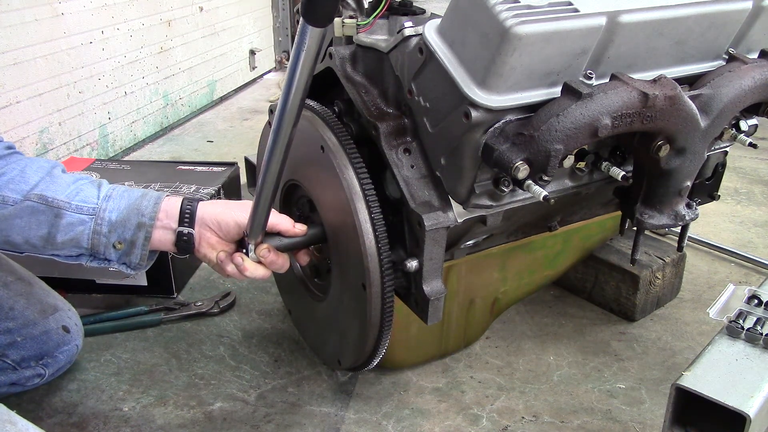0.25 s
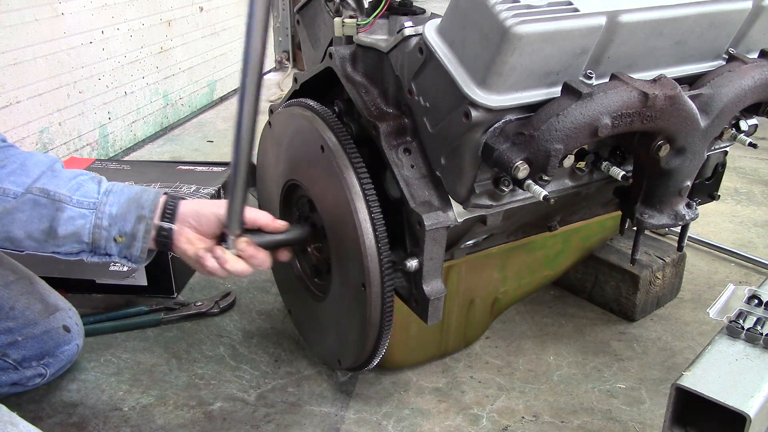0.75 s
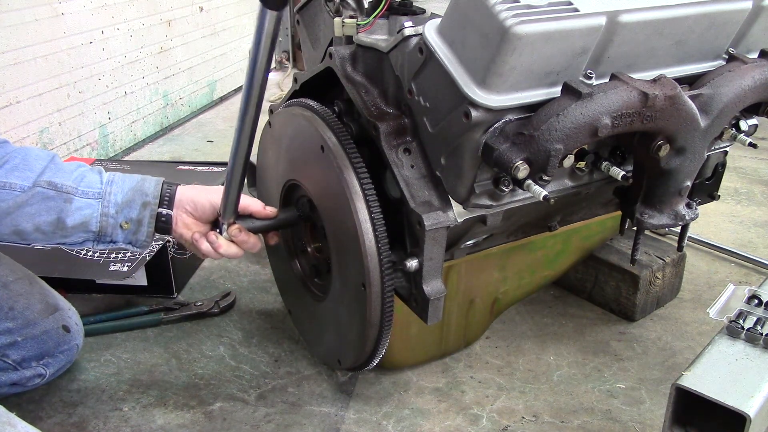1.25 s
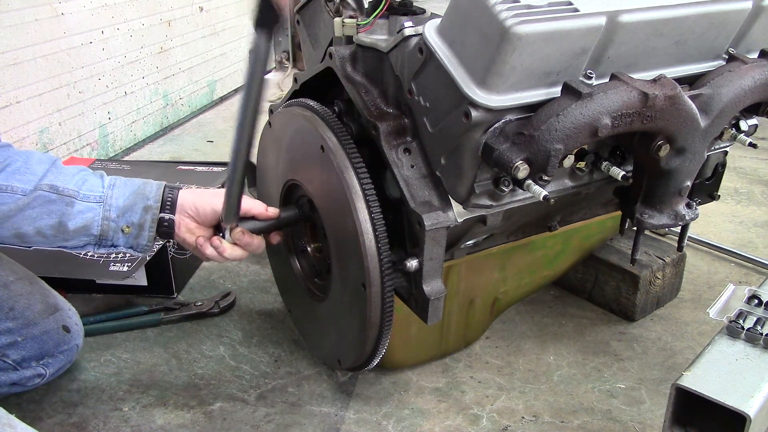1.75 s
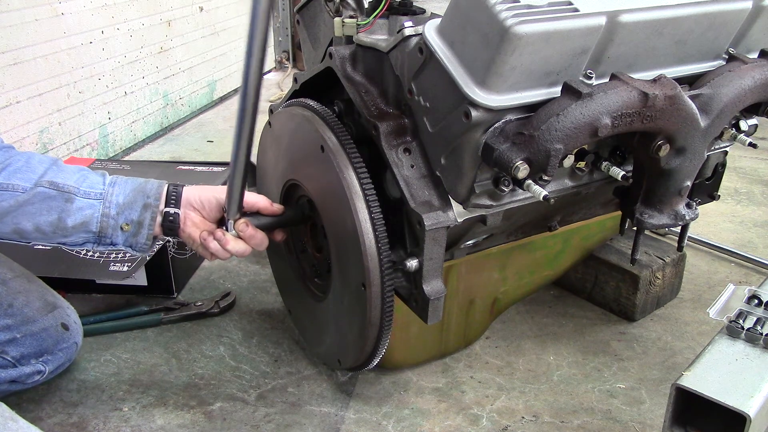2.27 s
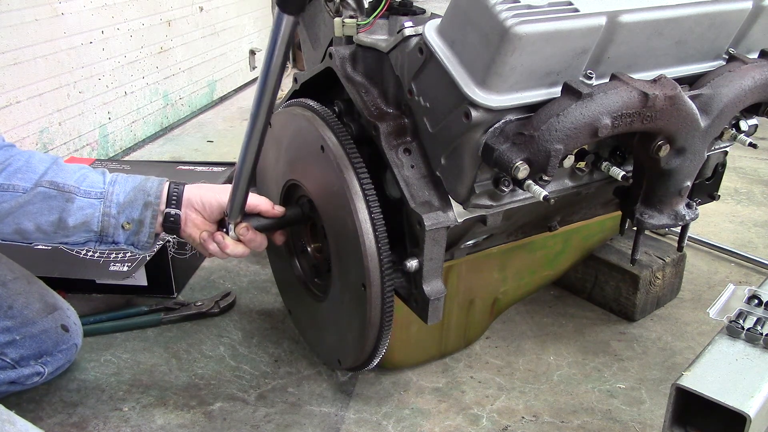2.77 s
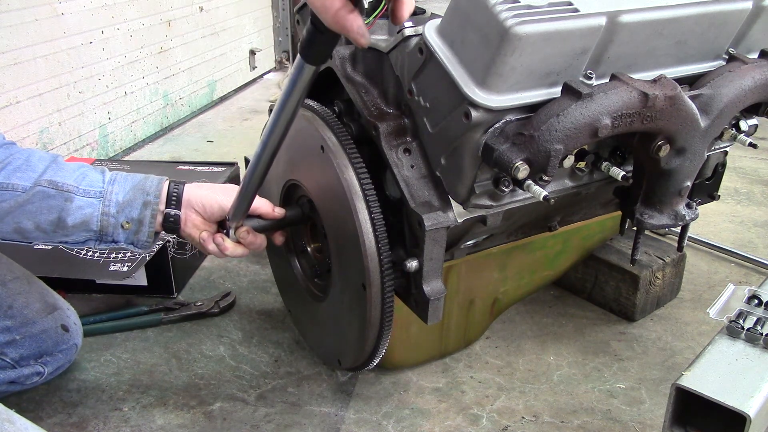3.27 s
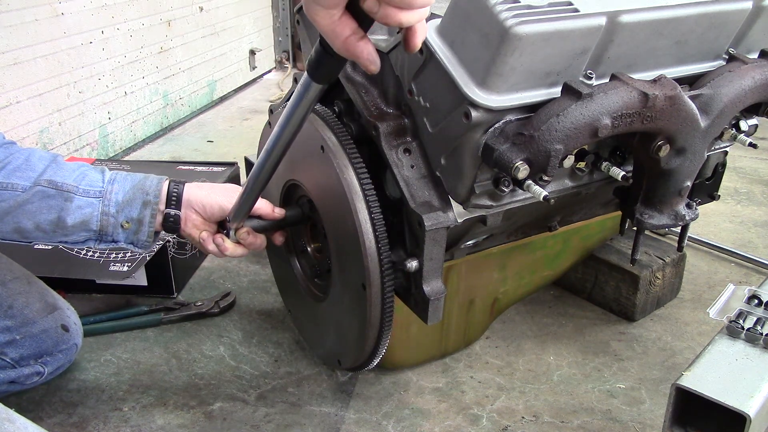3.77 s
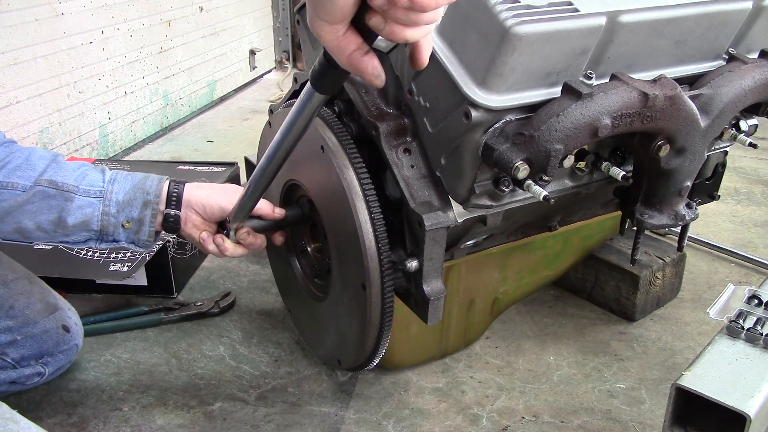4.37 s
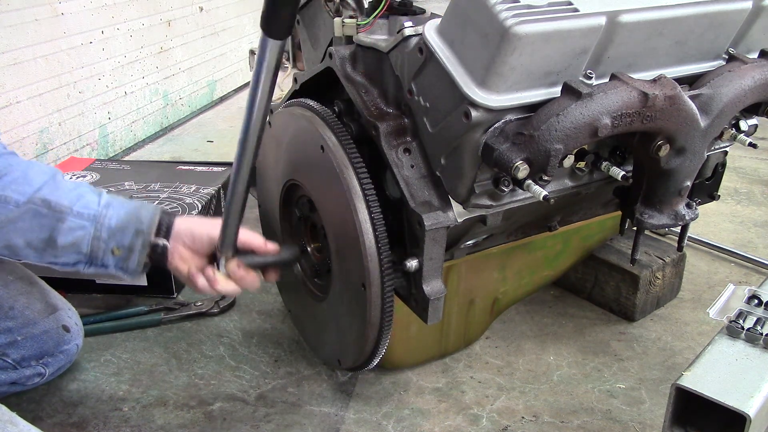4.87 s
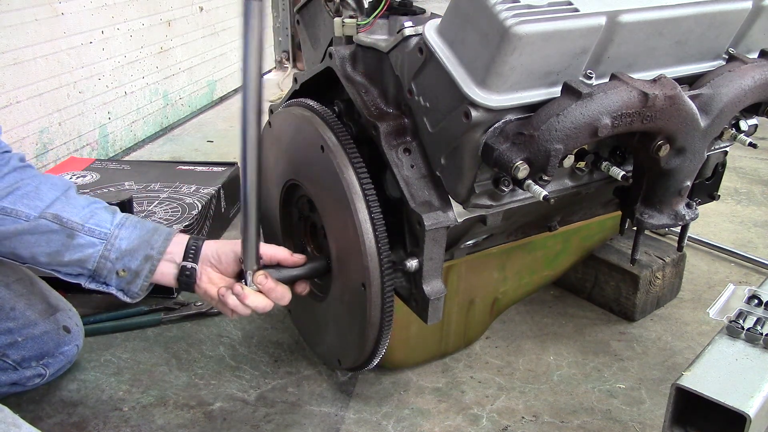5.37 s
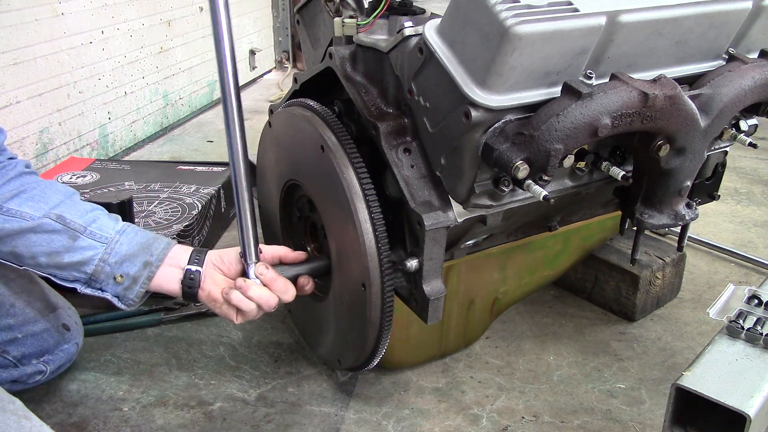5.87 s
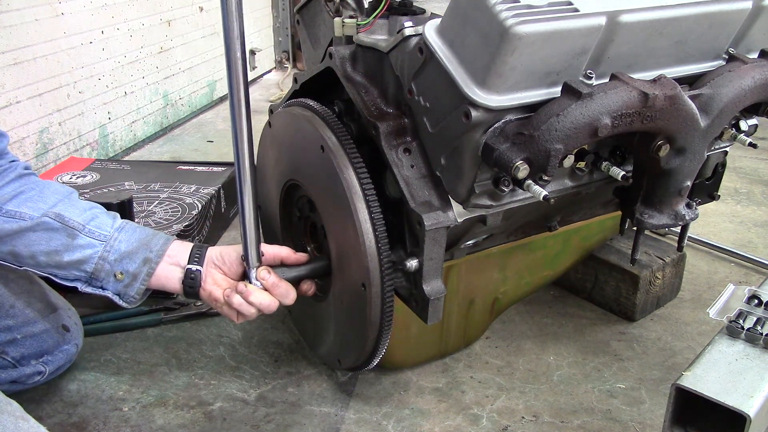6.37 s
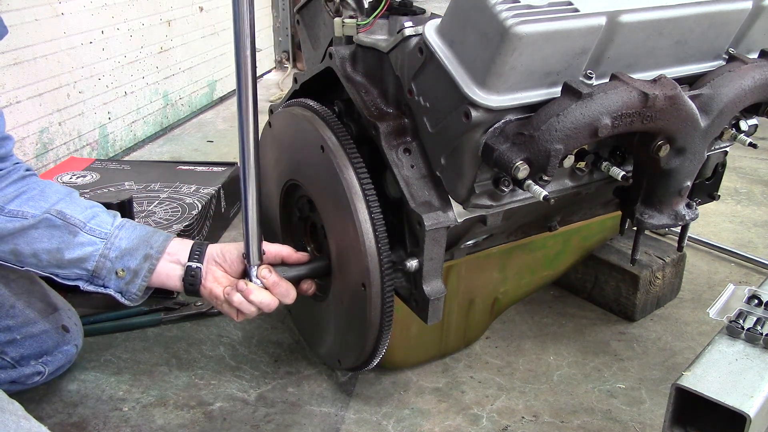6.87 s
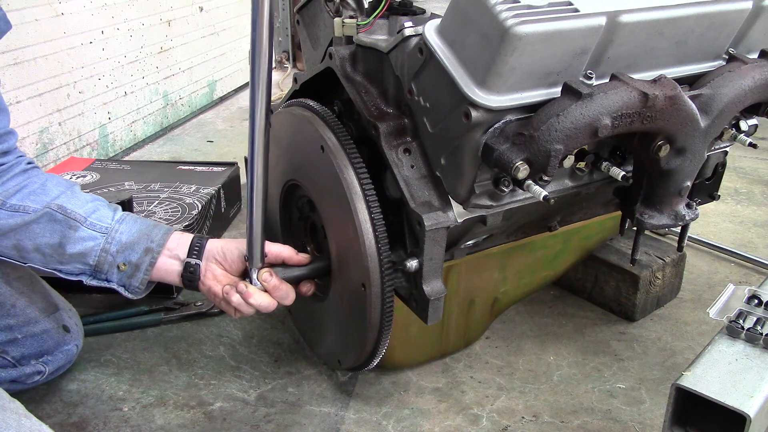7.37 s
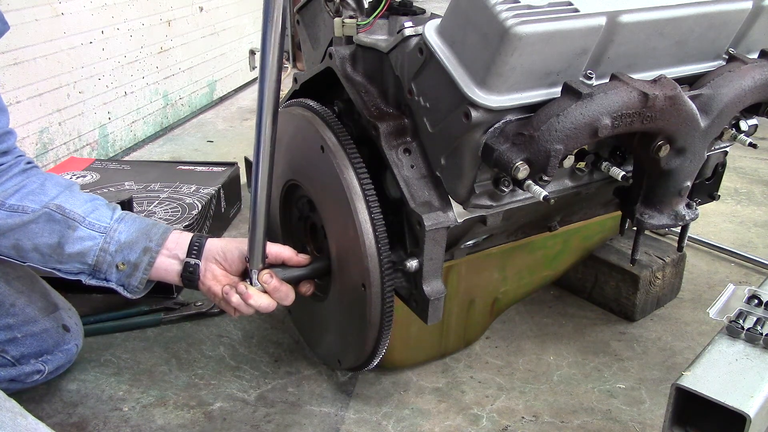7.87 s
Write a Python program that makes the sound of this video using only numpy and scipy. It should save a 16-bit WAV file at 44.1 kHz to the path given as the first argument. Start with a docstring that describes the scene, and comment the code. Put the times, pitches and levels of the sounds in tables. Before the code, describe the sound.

Sharp double clicks from a torque wrench and scattered ringing metal knocks as bolts are tightened in a hard-walled workshop.

```python
"""Sharp clicks and ringing knocks: a click-type torque wrench tightens an engine's flywheel bolts.
The pawl trips and resets three times; socket and extension knock on the bolts and ring the iron.
A hard-walled workshop answers each blow, and a sleeve rustles once as the grip changes.
Lamp hum, a low drone and a nearby camera's own hiss lie underneath."""
import sys
import numpy as np
from scipy import signal
from scipy.fft import rfft, irfft, next_fast_len
from scipy.io import wavfile
from scipy.ndimage import uniform_filter1d, minimum_filter1d

SR = 44100
rng = np.random.default_rng(int(sys.argv[2]) if len(sys.argv) > 2 else 0)


def dump(signal):
    """Clip the signal to [-1, 1] and save it as 16-bit WAV at the path in sys.argv[1]."""
    limited = np.clip(np.atleast_2d(signal).T, -1, 1)
    pcm = np.round(limited * 32767).astype(np.int16)
    wavfile.write(sys.argv[1], SR, pcm)


N = 358533
BLOW_T = np.arange(32768) / SR


def undb(db):
    """dB to amplitude gain."""
    return 10 ** (np.asarray(db) / 20)


def along(curve, hz):
    """Interpolate (Hz, value) points on a log-frequency axis."""
    points_hz, values = np.transpose(curve)
    return np.interp(np.log(np.maximum(hz, 1)), np.log(points_hz), values)


def shaped(x, gain):
    """Filter x by a gain function of Hz."""
    n = next_fast_len(x.shape[-1])
    hz = np.arange(n // 2 + 1) * SR / n
    return irfft(rfft(x, n) * gain(hz), n)[..., :x.shape[-1]]


def eq(x, curve):
    """Filter x by (Hz, dB) points."""
    return shaped(x, lambda hz: undb(along(curve, hz)))


def at_rms(x, db):
    """Scale x to an rms level."""
    return x * undb(db) / np.sqrt(np.mean(x ** 2))


# Each row: frequency in Hz, relative noise density in dB.
AIR_SPECTRUM = [(15, -55), (40, -17), (113, -4), (290, -4.5), (323, -12), (360, -6.5), (390, -1.5),
                (471, -10.5), (568, -5.5), (1060, -9.5), (1580, -13.5), (2240, -17), (5610, -13),
                (10700, -11.5), (15600, -28.5)]
# Each row: centre in Hz, width in Hz, level in dB.
NARROW_DRONES = [(353, 40, -68), (473, 30, -74), (1592, 90, -72.5), (5550, 760, -62), (6180, 530, -65.5),
                 (7570, 260, -70.5), (10600, 1500, -67.5)]
# Each row: frequency in Hz, side minus mid in dB.
AIR_WIDTH = [(25, -7.5), (60, -13.5), (110, -14.5), (200, -7), (380, -8.5), (700, -7), (1290, -9),
             (2380, -9.5), (4400, -15.5), (8120, -13), (15000, -9)]

def air():
    """Workshop drone and camera hiss with narrow hums on top; returns mid and side."""
    def drone_gain(f):
        density = sum(undb(db) ** 2 / width / (1 + (2 * (f - hz) / width) ** 2) ** 2
                      for hz, width, db in NARROW_DRONES)
        return np.sqrt(density * SR / 2)

    broad = eq(rng.standard_normal((2, N)), AIR_SPECTRUM)
    drones = shaped(rng.standard_normal((2, N)), drone_gain)
    mid, side = broad * undb(-56) / np.std(broad[0]) + drones
    return np.array([mid, eq(side, AIR_WIDTH)])


# Each row: frequency in Hz, rms level in dB.
MAINS_HARMONICS = [(120, -83), (360, -70.5), (480, -71)]

def lamps(waver_db=1.2, hold_samples=8192):
    """Lamp hum: mains harmonics whose levels waver slowly."""
    hz, db = np.array(MAINS_HARMONICS).T[:, :, None]
    steps = rng.standard_normal((len(hz), N // hold_samples + 1))
    waver = uniform_filter1d(np.repeat(steps, hold_samples, axis=1)[:, :N], size=hold_samples)
    tones = np.sin(2 * np.pi * (hz * np.arange(N) / SR + rng.random((len(hz), 1))))
    return np.sqrt(2) * (undb(db + waver_db * waver) * tones).sum(0)


# Each row: frequency in Hz, relative noise density in dB.
CLOTH_SPECTRUM = [(60, -44), (150, -9), (350, -4.5), (800, -7), (1500, -11.5), (3000, -24), (6000, -43)]

def sleeve(peak_s=2.574, rise_s=0.1, fall_s=0.11, level_db=-51):
    """Heavy cloth shifts as the grip changes: a dull, grainy rustle swells and fades."""
    t = np.arange(N) / SR - peak_s
    swell = np.exp(-.5 * (t / np.where(t < 0, rise_s, fall_s)) ** 2)
    noise = rng.standard_normal(N)
    grain_db = 0.66 * np.repeat(rng.exponential(size=N // 200 + 1), 200)[:N]
    return swell * at_rms(eq(noise * undb(grain_db), CLOTH_SPECTRUM), level_db)


# Each row: frequency in Hz, T60 in seconds, relative level in dB.
ROOM_BANDS = [(148, 0.87, -1), (390, 0.55, 12.5), (981, 0.81, 1), (2500, 0.68, -0.5), (4640, 0.76, -0.5),
              (8864, 0.21, 0.5), (14000, 0.17, 2)]

def room(mid_db=-10, side_vs_mid_db=-18.5, predelay_s=0.0032):
    """Dense wall reflections, mid and side, new for each blow; the treble dies first."""
    hz, age_s, cells = signal.stft(rng.standard_normal((2, len(BLOW_T))), SR, nperseg=256)
    t60, db = (along(np.array(ROOM_BANDS)[:, [0, k]], hz)[:, None] for k in (1, 2))
    tail = signal.istft(cells * undb(db - 60 * age_s / t60), SR, nperseg=256)[1][:, :len(BLOW_T)]
    tail *= np.clip((BLOW_T - predelay_s) / 0.0015, 0, 1)
    return tail * undb([[mid_db], [mid_db + side_vs_mid_db]]) / np.sqrt(np.sum(tail[0] ** 2))


def crack(resonances, colour, grit_db, rattle_s):
    """Metal contact: damped resonances swell and die within milliseconds; grit fills between them."""
    hz, width, db = np.array(resonances).T[:, :, None]
    t = BLOW_T[:2048]
    age = t * 2 * np.pi * 1.4 * width
    phase = np.arange(len(hz))[:, None] / 2 + .08 * rng.standard_normal(hz.shape)  # neighbours oppose
    tones = undb(db) * width * age * np.exp(-age) * np.sin(2 * np.pi * (hz * t + phase))
    envelope = (1 - np.exp(-t / 0.00018)) * np.exp(-t / rattle_s)
    grit = at_rms(envelope * rng.standard_normal(len(t)), grit_db)
    grit *= rattle_s / .004  # a longer rattle drowns the first strike
    contact = at_rms(tones.sum(0), 0) + eq(grit, np.array(resonances)[:, ::2])
    contact = eq(np.pad(contact, (64, 0)), colour)[64:]
    onset_rms = np.sqrt(np.mean(contact[:int(.005 * SR)] ** 2))
    return np.pad(contact / (1.736 * onset_rms), (0, len(BLOW_T) - len(t)))


def ring(modes, colour, rise_s=0.0045):
    """Free modes of struck metal build up and fade."""
    hz, db, t60 = np.array(modes).T[:, :, None]
    envelopes = undb(db + along(colour, hz) - 60 * BLOW_T / t60)
    tones = np.sin(2 * np.pi * (hz * BLOW_T + rng.random((len(hz), 1))))
    return (1 - np.exp(-BLOW_T / rise_s)) * (envelopes * tones).sum(0)


# Each row: frequency in Hz, relative level in dB, T60 in seconds.
BLOCK_MODES = [(350, -5, .4), (420, -9, .5), (495, -5, .3), (554, -3, .3), (596, -4, .3), (861, -5, .3),
               (980, -6, .3), (1098, -3, .33), (1245, -4, .25), (1390, -6, .25), (1534, -5, .2),
               (1642, -7, .28), (2121, -5, .2), (2213, -8, .28), (2627, -7, .28), (2975, 0, .15)]
FLYWHEEL_MODES = [(746, 0, .75), (1696, 1, .38), (2929, -1, .33), (5095, 3, .25), (5740, 1.5, .14),
                  (6920, -8, .25)]

def blow(row, resonances, part_modes, grit_db, ring_tint, rebound_s):
    """A contact rebounds once and rings tool part, block and flywheel; returns direct, room mid, side."""
    start_s, db, rattle_s, rebound_db, knee_hz, below, above, part_db, block_db, wheel_db = row
    octaves = np.array([-4, 0, 4])
    colour = np.c_[knee_hz * 2. ** octaves, -abs(octaves) * [below, 0, above]]
    ring_colour = colour * [1, ring_tint]
    rings = (undb(part_db) * ring(part_modes, ring_colour)
             + undb(block_db) * ring(BLOCK_MODES, ring_colour)
             + undb(wheel_db) * ring(FLYWHEEL_MODES, ring_colour))
    strike, rebound = (crack(resonances, colour, grit_db, rattle_s) for _ in range(2))
    contact = strike + undb(rebound_db) * np.roll(rebound, int(rebound_s * SR))
    room_send = contact + undb(-9) * rings  # the iron stirs the room less than the crack
    wet = signal.fftconvolve(room_send[None], room(), axes=1)
    out, i = np.zeros((3, N + 2 * SR)), int(start_s * SR)
    out[0, i:i + len(BLOW_T)] = contact + rings
    out[1:, i:i + wet.shape[1]] = wet
    return undb(db) * out[:, :N]


# Each row: start in seconds, level in dB, rattle decay in seconds, rebound in dB, knee in Hz,
# fall below and above the knee in dB/octave, ring of extension, block and flywheel in dB.
SOCKET_KNOCKS = [(.578, -40, 0.0022, -9, 4000, 8, 5, -21, -39, -42),
                 (.681, -42, 0.021, -3, 895, 8, 10.5, -6, -27, -12.5),
                 (.824, -47, 0.0025, -16, 1900, 12, 8, -24, -25, -15),
                 (.988, -24, 0.016, -6, 2420, -0.6, 13, -11.5, -16, -20),
                 (1.43, -40, 0.022, -2, 1400, -1.5, 9, -25, -6, -5.5),
                 (1.457, -12.5, 0.0051, -8.5, 3000, 4, 17, -45, -19.5, -26),
                 (1.82, -38, 0.009, 7, 3000, -1, 1.5, -32.5, -33, -28),
                 (1.833, -3.5, 0.0073, -7.5, 2960, 3, 6.5, -20, -25, -22),
                 (2.239, -44, .003, -26, 900, 5, 7, -29, -32, -29),
                 (4.724, -36, 0.0086, -24, 760, 16, 7.5, -32, -28, -14.5),
                 (5.017, -52, .003, -9, 5200, 6, 10, -26, -29, -27),
                 (5.139, -16.5, 0.014, -4.5, 850, 14, 4.5, -6.5, -22.5, -26),
                 (5.626, -32, 0.0075, -12, 3000, 5, 3.5, -23, -26, -18),
                 (5.653, -14, 0.0064, 0.5, 1770, 5, 10.5, -14, -15, -29),
                 (5.956, -42, .003, -13, 895, 2, 2, -29, -16, -19),
                 (6.424, -39.5, 0.029, -10, 800, 10, 17.5, -24.5, -8.5, -8.5)]
# Each row: frequency in Hz, width in Hz, relative level in dB.
SOCKET_RESONANCES = [(613, 200, 1), (933, 480, -0.5), (1390, 320, 4), (1600, 610, -1), (2161, 310, 2),
                     (2422, 830, 4.5), (2900, 300, 3.5), (3210, 61, 7.5), (4020, 190, -4.5),
                     (4280, 350, -7), (5164, 300, 0.5), (6200, 500, -2.5), (7160, 460, -3),
                     (10500, 1400, -10.5)]
# Each row: frequency in Hz, relative level in dB, T60 in seconds.
EXTENSION_MODES = [(3243, 0, .48), (3269, 0, .24)]

def socket_knocks():
    """The socket knocks on the bolts, ringing the extension bar and the iron."""
    return sum(blow(row, SOCKET_RESONANCES, EXTENSION_MODES, grit_db=-1.5, ring_tint=0.71,
                    rebound_s=.00184) for row in SOCKET_KNOCKS)


# Each row: start in seconds, level in dB, rattle decay in seconds, fall below and above the knee
# in dB/octave, frequency the grip leaves freest in Hz, pin ring in dB.
PAWL_TRIPS = [(.047, -11.5, 0.0066, -1, -3, 2270, -26), (4.1365, -14, 0.0054, -0.5, -2, 2550, -10.5),
              (7.807, -12, 0.0062, 0, -1.8, 4100, -25)]
PAWL_RESETS = [(.373, -12, 0.003, 10, -0.7, 900, -24), (4.4355, -16.5, 0.0024, -2.5, 0.26, 2120, -21),
               (8.124, -11.5, 0.0042, 12, 0.22, 3330, -11)]
# Hand-damped wrench head. Each row: frequency in Hz, width in Hz, relative level in dB.
TRIPPED_RESONANCES = [(939, 50, 6.5), (1670, 127, -6.5), (2180, 108, 4), (2720, 246, 1.5), (3080, 460, -5),
                      (4150, 240, 0), (5200, 160, -4), (6330, 140, 4), (7180, 150, -3.5), (8800, 730, -14),
                      (11270, 410, -11), (12450, 530, -22), (12900, 540, -13.5)]
SEATED_RESONANCES = [(858, 54, 3), (1830, 180, 0), (2614, 84, 3.5), (3390, 300, 0.5), (4180, 45, 2.5),
                     (4900, 250, 3), (5850, 240, 1), (7540, 900, -1), (8280, 270, -36.5), (9340, 170, -3),
                     (10800, 1100, -35.5), (10800, 370, -4), (12800, 700, -12)]
# Each row: frequency in Hz, relative level in dB, T60 in seconds.
PIN_MODES = [(10600, 0, .2)]

def pawl_clicks(clicks, head, grit_db, rebound_s, rebound_db):
    """The pawl snaps in the head and barely rings the iron; the grip leaves one band freer to sound."""
    knee_hz, block_db, wheel_db = 920, -44, -34
    grip_db, grip_octaves = 2.5, 0.4
    out = np.zeros((3, N))
    for start_s, db, rattle_s, below, above, free_hz, pin_db in clicks:
        held = np.array(head, float)
        held[:, 2] += grip_db * np.exp(-.5 * (np.log2(held[:, 0] / free_hz) / grip_octaves) ** 2)
        row = (start_s, db, rattle_s, rebound_db, knee_hz, below, above, pin_db, block_db, wheel_db)
        out += blow(row, held, PIN_MODES, grit_db, ring_tint=.3, rebound_s=rebound_s)
    return out


# Stereo width of the direct sound: a faint, slightly delayed, treble-leaning copy in the side channel.
# Each row: frequency in Hz, gain in dB.
DIRECT_WIDTH = [(300, -26.5), (1500, -30), (5000, -20.5), (12000, -20)]

def scene():
    """The wrench near the centre of the workshop; returns left and right."""
    radiated_hz = (312, 13700)  # small parts radiate little bass; contact is too slow for the very top
    width_delay_s = 0.0009
    hits = pawl_clicks(PAWL_TRIPS, TRIPPED_RESONANCES, grit_db=-7, rebound_s=.0022, rebound_db=-1)
    hits += pawl_clicks(PAWL_RESETS, SEATED_RESONANCES, grit_db=2, rebound_s=.00114, rebound_db=-2)
    hits += socket_knocks()
    hits = signal.sosfilt(signal.butter(4, radiated_hz, "band", fs=SR, output="sos"), hits)
    direct, reverb = hits[0] + sleeve() + lamps(), hits[1:]
    direct_side = eq(np.pad(direct, (int(width_delay_s * SR), 0))[:N], DIRECT_WIDTH)
    mid, side = reverb + air() + [direct, direct_side]
    return np.array([mid + side, mid - side])


# Each row: frequency in Hz, left minus right in dB.
CAPSULE_BALANCE = [(100, -0.5), (1000, -0.5), (4000, -0.6), (12000, -0.5)]

def record(dry):
    """Two slightly unequal capsules, a fast peak limiter and a steep low-pass."""
    ceiling, limiter_s, top_hz = .78, .003, 16500
    x = shaped(dry, lambda hz: undb(along(CAPSULE_BALANCE, hz) * np.array([[.5], [-.5]])))
    span = int(limiter_s * SR)
    gain = np.minimum(1, ceiling / (np.abs(x).max(0) + 1e-9))
    x *= uniform_filter1d(minimum_filter1d(gain, size=span), size=span)
    return signal.sosfilt(signal.ellip(10, .2, 80, top_hz, fs=SR, output="sos"), x)


dry = scene()
out = record(dry)
dump(out)
```